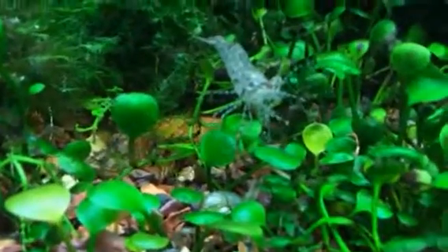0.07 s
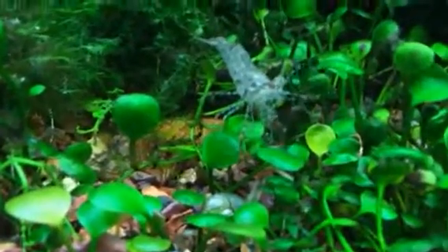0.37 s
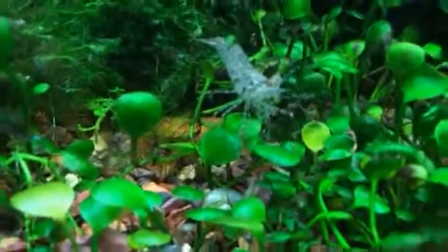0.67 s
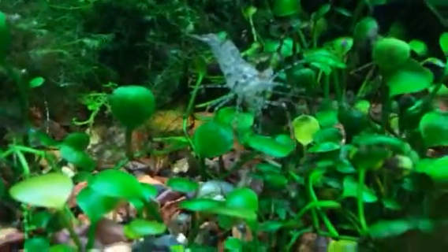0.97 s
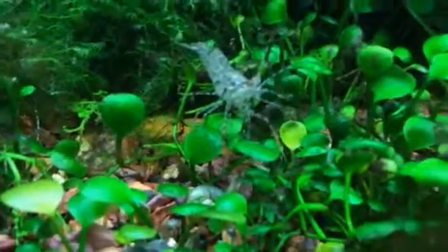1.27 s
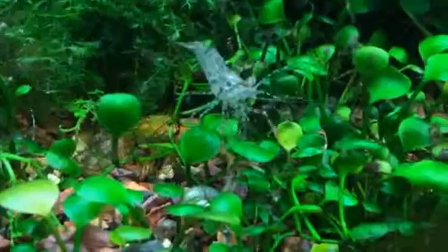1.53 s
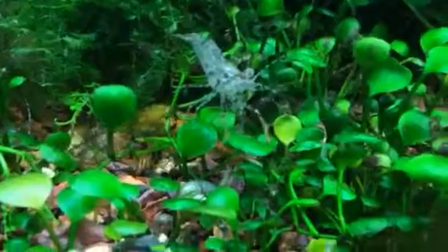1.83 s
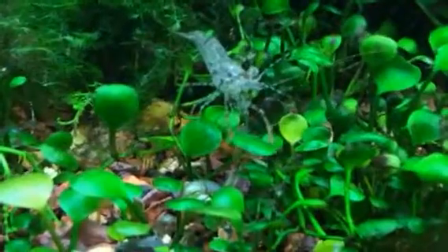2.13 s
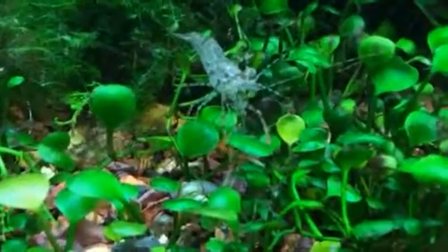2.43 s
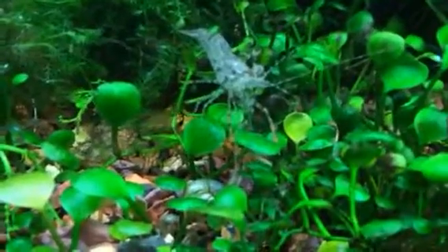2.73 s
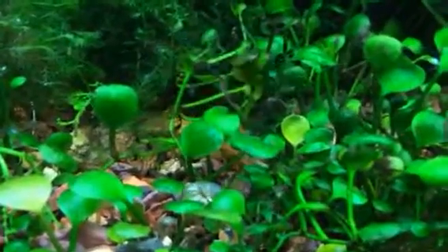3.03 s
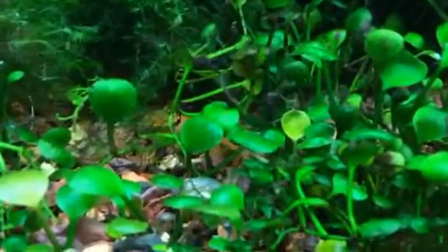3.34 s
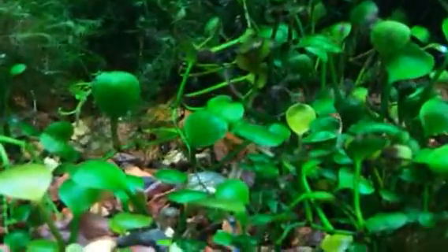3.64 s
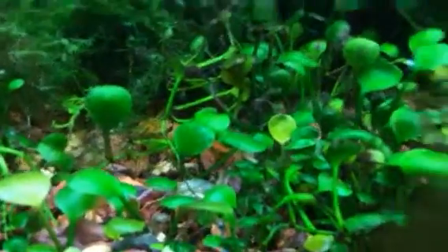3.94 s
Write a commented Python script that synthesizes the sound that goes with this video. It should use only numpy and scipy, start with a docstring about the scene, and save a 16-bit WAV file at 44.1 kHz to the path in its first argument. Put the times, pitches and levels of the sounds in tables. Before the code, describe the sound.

A quiet, wavering aquarium motor hum with faint hiss and a few tiny ticks.

```python
"""A quiet room, close to an aquarium tank whose equipment is running.
The motor's low hum swells and steadies, a deeper throb comes and goes, and vibration makes the
cabinet drone at a few pitches. Behind them lie a dull wash of moving water and air and a thin hiss.
Now and then come a tiny bubble pop, very faint ticks, brief hollow tones and one soft, low bump."""
import sys
import numpy as np
from scipy import signal
from scipy.fft import rfft, irfft
from scipy.io import wavfile
from scipy.ndimage import uniform_filter1d

SR = 44100
rng = np.random.default_rng(int(sys.argv[2]) if len(sys.argv) > 2 else 0)


def put_to_file(sound):
    """Save the sound as 16-bit audio at rate SR, in the file named by the first command-line argument."""
    columns = np.atleast_2d(sound).T  # one column per channel
    safe = np.clip(columns, -1, 1)
    whole_steps = np.round(safe * 32767)
    wavfile.write(sys.argv[1], SR, whole_steps.astype(np.int16))


N = 176400  # samples: 4 seconds


def undb(db):
    """Turn decibels (dB) into a number to multiply a sound by."""
    return 10 ** (np.asarray(db) / 20)


def unit(x):
    """Scale a signal so that its average power is 1."""
    return x / np.sqrt(np.mean(x ** 2))


def fader(rows):
    """A volume curve that glides between points of time in seconds and level in dB."""
    return undb(np.interp(np.arange(N) / SR, *np.array(rows).T))


def drift(rate_hz):
    """Smooth random movement of typical size 1; a higher rate moves faster."""
    f = np.fft.rfftfreq(N, 1 / SR)
    return unit(irfft(rfft(rng.standard_normal(N)) * np.exp(-(f / rate_hz) ** 2), N))


def wavering(hz, wander_hz, rate_hz):
    """A pure tone whose pitch wanders at random."""
    pitch = hz + wander_hz * drift(rate_hz)
    return np.sqrt(2) * np.sin(2 * np.pi * np.cumsum(pitch) / SR)


def coloured(points):
    """Noise shaped by points of frequency in Hz and relative level in dB, fading above the last."""
    hz, db = np.array(points).T
    f = np.fft.rfftfreq(N, 1 / SR) + 1
    gain = undb(np.interp(np.log(f), np.log(hz), db)) / (1 + (f / hz[-1] / 2) ** 4)
    return unit(irfft(rfft(rng.standard_normal(N)) * gain, N))


def ringing(hz, width_hz):
    """Something shaken at random rings around one pitch; a smaller width gives a clearer note."""
    f = np.fft.rfftfreq(N, 1 / SR) + 1
    detune = (f * f - hz * hz) / (f * width_hz)
    return unit(irfft(rfft(rng.standard_normal(N)) / (1 + detune ** 2), N))


def steady(x, span_s):
    """Even out loudness changes slower than the span, keeping the quick flutter."""
    power = x ** 2
    for _ in range(2):
        power = uniform_filter1d(power, max(int(span_s * SR), 2))
    return x / np.sqrt(np.abs(power) + 1e-9)


def burst(start_s, rise_s=0.0015, decay_s=0.0051):
    """The volume curve of a tick or pop: it jumps up and dies away quickly."""
    age = np.maximum(np.arange(N) / SR - start_s, 0)
    return np.minimum(age / rise_s, 1) * np.exp(-np.maximum(age - rise_s, 0) / decay_s)


def motor_hum():
    """The motor hums an almost pure note, wavering a little, over an uneven buzz."""
    # How loud the note and the buzz are. Each row: time in seconds, level in dB.
    note_levels = [(0, -80), (.75, -62), (1.55, -60), (1.7, -53), (2.0, -57), (2.23, -53), (2.34, -59),
                   (2.66, -46.5), (2.88, -46.5), (3.06, -58), (3.17, -49), (3.27, -41.5), (3.48, -43.5),
                   (3.59, -39.5), (3.67, -45.5), (3.71, -49), (3.87, -44.5), (4, -44.5)]
    buzz_levels = [(0, -68), (.5, -65.5), (.9, -56.5), (2.2, -58), (2.6, -63), (3.5, -53), (4, -55)]
    note = wavering(hz=104.78, wander_hz=0.71, rate_hz=5) * fader(note_levels)
    flutter_db = 0.5 * drift(rate_hz=14)
    buzz = steady(ringing(hz=111.1, width_hz=33.4), span_s=0.056) * fader(buzz_levels)
    return note * undb(flutter_db) + buzz


def rumble():
    """A vibration throbs about an octave below the hum, on a bed of deep noise."""
    # How loud the throb and the bed are. Each row: time in seconds, level in dB.
    throb_levels = [(0, -60.5), (.35, -80), (.72, -70), (.88, -47.5), (.95, -66), (1.01, -45.5), (1.2, -55),
                    (1.63, -55.5), (1.73, -74), (1.85, -50.5), (2.15, -56), (2.42, -61.5), (3.1, -67),
                    (4, -68)]
    bed_levels = [(0, -67), (.68, -69), (.88, -59), (2.2, -57.5), (2.9, -59.5), (4, -59)]
    # The bed's tone colour. Each row: frequency in Hz, relative level in dB.
    bed_colour = [(15, -16.5), (28, -4.5), (39, -6), (50, -2), (64, 2), (80, -0.5), (100, -14.5),
                  (180, -41.5)]
    throb = wavering(hz=55.2, wander_hz=3.5, rate_hz=5.84) * fader(throb_levels)
    flutter_db = drift(rate_hz=14)
    bed = steady(coloured(bed_colour), span_s=0.13) * fader(bed_levels)
    return throb * undb(flutter_db) + bed


def cabinet_drone():
    """Random vibration makes the cabinet ring at its own natural pitches."""
    # The cabinet's notes. Each row: pitch in Hz, width in Hz, relative level in dB.
    notes = [(130.3, 20, -3), (183.5, 25, -4.5), (206.4, 21, 0), (249.6, 26, -4.5), (275.2, 12, -4.5),
             (322, 48, -5), (459.7, 12, -14)]
    # How loud the drone is. Each row: time in seconds, level in dB.
    levels = [(0, -63.5), (.65, -64), (.9, -59.5), (1.4, -56), (1.7, -59.5), (2.4, -57.5), (2.9, -58.5),
              (3.5, -58), (4, -64.5)]
    body = sum(undb(db) * ringing(hz, width) for hz, width, db in notes)
    return steady(body, span_s=0.22) * fader(levels)


def wash():
    """Moving water and air make a dull rush, whose higher part swells on its own."""
    # The tone colour of each part. Each row: frequency in Hz, relative level in dB.
    low_colour = [(60, -10), (200, 1.5), (330, -2), (400, -0.5), (500, 1), (750, -1), (1050, -4.5),
                  (1400, -15), (1900, -22), (3500, -38)]
    high_colour = [(700, -26), (1100, 1.5), (1300, 0), (1560, -4), (1700, -13.5), (2300, -24)]
    # How loud each part is. Each row: time in seconds, level in dB.
    low_levels = [(0, -68.5), (.55, -66), (.9, -64.5), (1.3, -63.5), (1.8, -65.5), (2.1, -66), (2.45, -64),
                  (3.1, -64.5), (3.5, -68.5), (4, -68)]
    high_levels = [(0, -73), (.5, -73), (.9, -70.5), (1.4, -74.5), (1.85, -75.5), (2.3, -73.5),
                   (2.9, -78.5), (3.3, -76), (4, -78.5)]
    low = coloured(low_colour) * fader(low_levels)
    flutter_db = 0.5 * drift(rate_hz=11)
    high = coloured(high_colour) * fader(high_levels)
    return low * undb(flutter_db) + high


def hiss(level_db=-76.5):
    """A thin hiss that stays even throughout."""
    # The hiss's tone colour. Each row: frequency in Hz, relative level in dB.
    colour = [(100, 0.5), (1800, 6), (2800, 1.5), (4500, -0.5), (7000, -1), (10000, -3), (15000, -3)]
    return undb(level_db) * coloured(colour)


def bubble_pop(level_db=-71.5):
    """One tiny bubble pops and rings for an instant at two high pitches."""
    # The bubble's notes. Each row: pitch in Hz, width in Hz, relative level in dB.
    notes = [(5100, 900, -1.5), (6900, 870, -2)]
    ring = unit(sum(undb(db) * ringing(hz, width) for hz, width, db in notes))
    return undb(level_db) * burst(start_s=0.3205) * ring


def hollow_tones():
    """Hollow tones rise out of the wash for a moment and sink back."""
    # Each row: middle in seconds, half-length in seconds, pitch in Hz, width in Hz, peak level in dB.
    swells = [(0.446, 0.15, 1510, 200, -77.5), (0.883, 0.25, 477, 14, -69.5), (1.193, .3, 812, 70, -73),
              (2.33, 0.084, 1540, 58, -81), (2.34, 0.19, 342, 90, -67.5), (2.583, 0.18, 758, 51, -71),
              (2.964, 0.052, 269, 18, -55), (3.08, 0.24, 461.7, 11, -70)]
    t = np.arange(N) / SR
    out = np.zeros(N)
    for middle, half_length, hz, width, db in swells:
        rise_and_fall = np.exp(-((t - middle) / half_length) ** 2 / 2)
        out += undb(db) * rise_and_fall * steady(ringing(hz, width), span_s=0.1)
    return out


def ticks():
    """Faint, dry ticks, each a very short burst of noise."""
    # Each row: start in seconds, level in dB, centre frequency in Hz, width in Hz.
    clicks = [(.878, -80, 5500, 4000), (1.978, -64, 2080, 3950), (2.661, -71, 2190, 3400)]
    return sum(undb(db) * burst(start) * ringing(hz, width) for start, db, hz, width in clicks)


def bump(rise_s=0.0092):
    """A soft, low knock swells and dies within a few vibrations."""
    # Each row: start in seconds, peak level in dB, pitch in Hz.
    knocks = [(2.181, -38.5, 98)]
    out = np.zeros(N)
    for start, db, hz in knocks:
        age = np.maximum(np.arange(N) / SR - start, 0)
        rise_and_fall = age / rise_s * np.exp(1 - age / rise_s)
        out += undb(db) * rise_and_fall * np.sin(2 * np.pi * hz * age)
    return out


def scene():
    """Add all the sounds together in one channel."""
    low_sounds = motor_hum() + rumble() + bump() + cabinet_drone()
    faint_sounds = wash() + hollow_tones() + ticks() + bubble_pop() + hiss()
    return (low_sounds + faint_sounds)[None]


def record(dry):
    """Cut away the very highest treble with a steep filter."""
    top_hz = 15250
    return signal.sosfilt(signal.ellip(10, .1, 70, top_hz, fs=SR, output="sos"), dry)


dry = scene()
out = record(dry)
put_to_file(out)
```